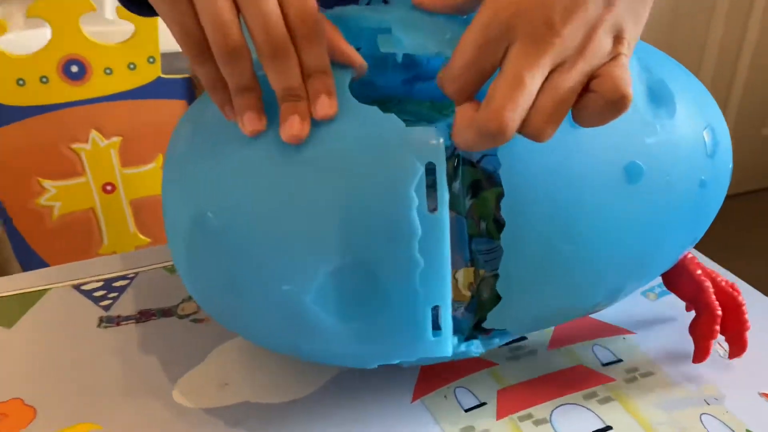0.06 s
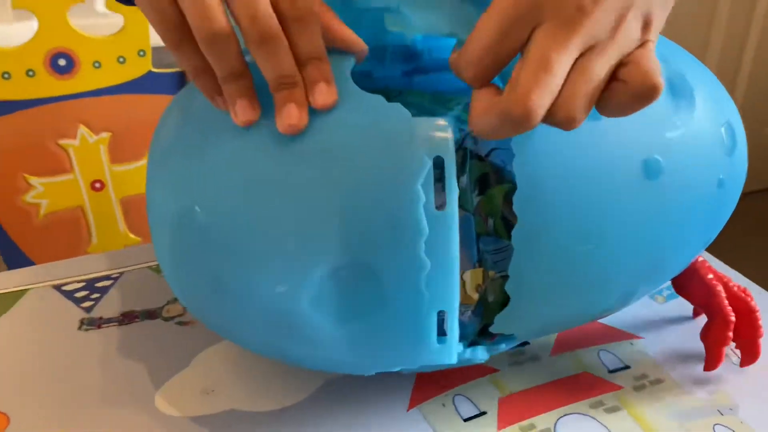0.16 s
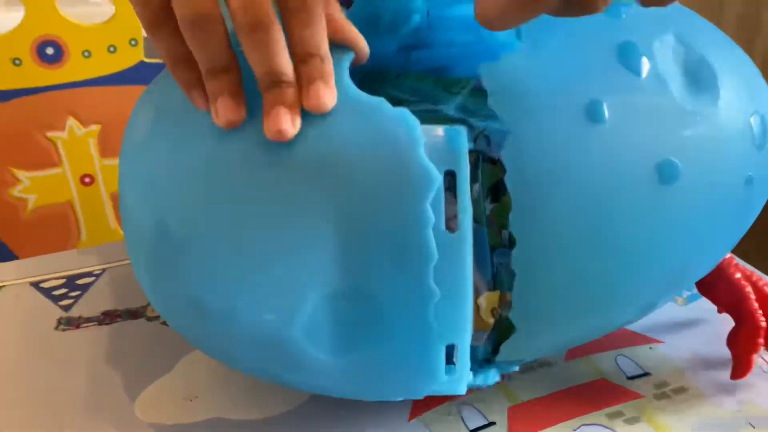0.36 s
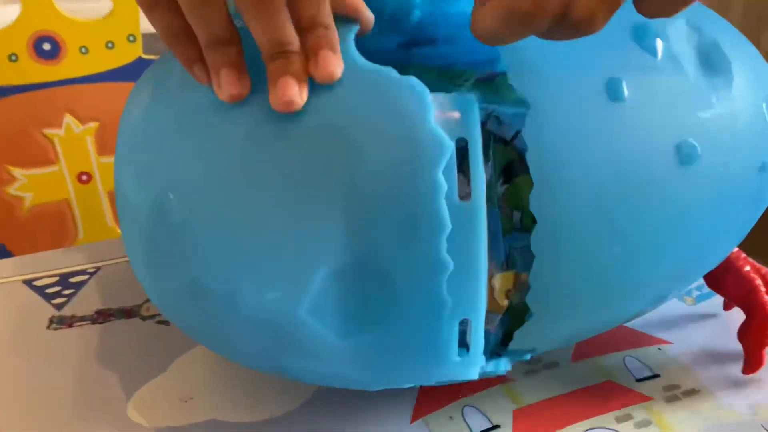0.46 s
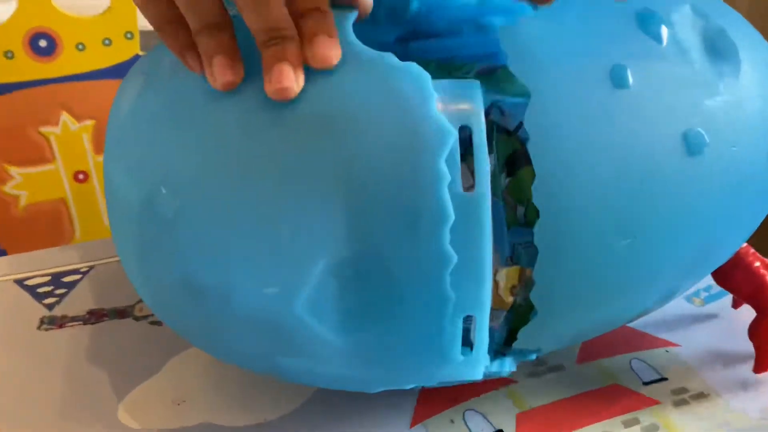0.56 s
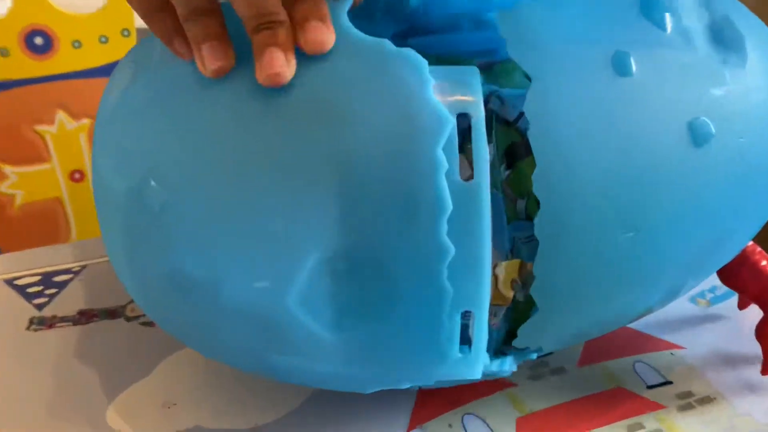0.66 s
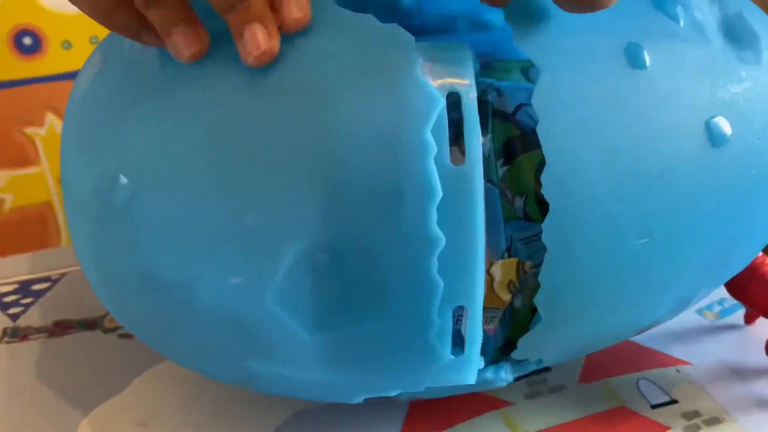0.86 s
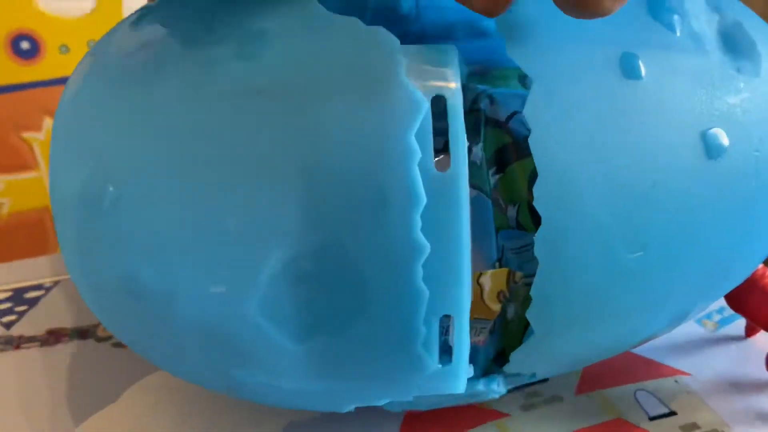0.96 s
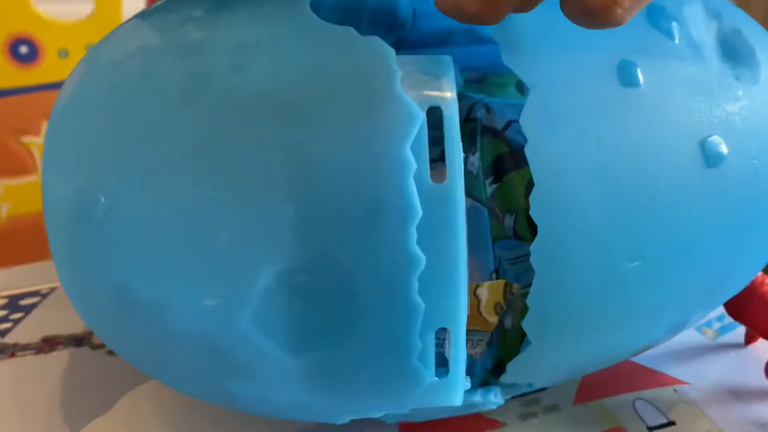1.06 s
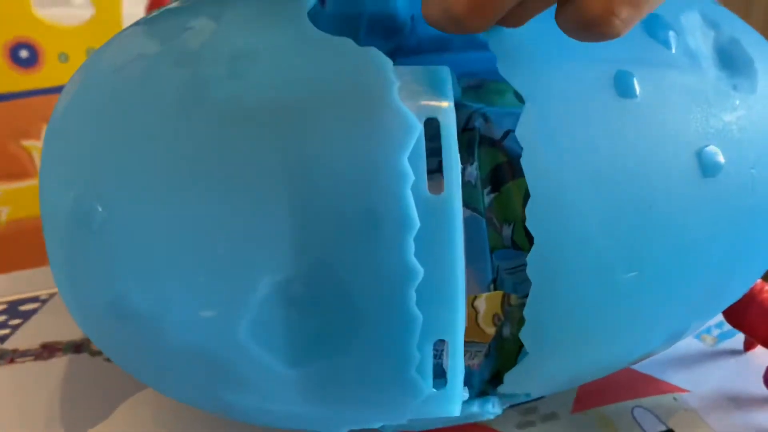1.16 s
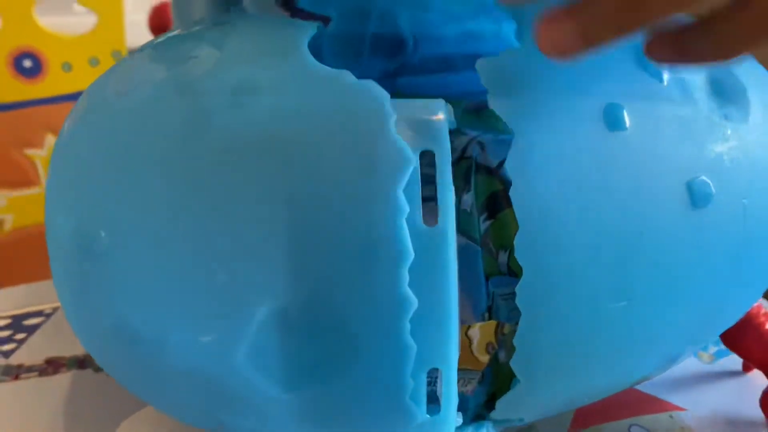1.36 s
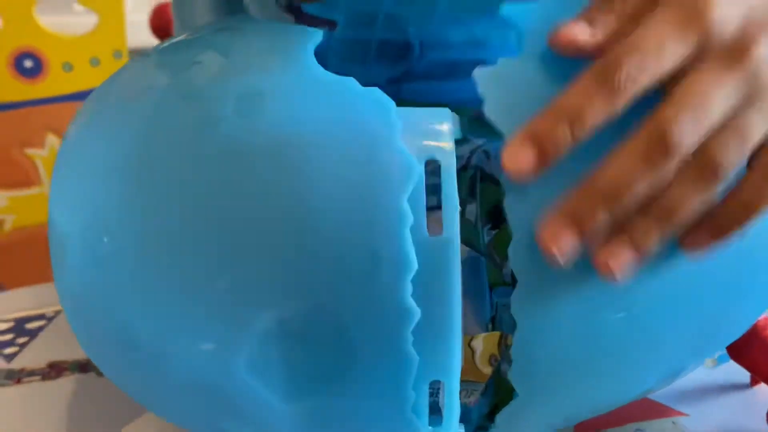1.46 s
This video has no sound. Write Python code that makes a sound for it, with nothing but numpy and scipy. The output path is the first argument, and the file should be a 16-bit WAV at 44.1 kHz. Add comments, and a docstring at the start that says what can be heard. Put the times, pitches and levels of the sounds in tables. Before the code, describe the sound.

A plastic shell snaps open with a hollow clack, followed by light bumps and scraping.

```python
"""At a table in a small room, hands prise a big hollow plastic toy egg apart, close by.
The seam lets go with a burst of cracks and the halves knock together; bending waves are dispersive,
so each blow reaches the air treble first, bass last, and the shell rings on in its modes.
Then edges and fingers rub and bump, squeak thinly once, and a last knock starts a bright scrape."""
import sys
import numpy as np
from scipy import signal
from scipy.fft import rfft, irfft
from scipy.io import wavfile
from scipy.ndimage import uniform_filter1d

SR = 44100
rng = np.random.default_rng(int(sys.argv[2]) if len(sys.argv) > 2 else 0)


def output_pcm(signal):
    """Save a mono or channel-first signal as 16-bit PCM at the path in sys.argv[1].

    Samples are clipped to [-1, 1] before scaling.
    """
    pcm = np.clip(np.atleast_2d(signal).T, -1, 1) * 32767
    wavfile.write(sys.argv[1], SR, np.round(pcm).astype(np.int16))


N = 66150


def amp(db):
    """Amplitude ratio of a level in decibels."""
    return 10 ** (np.asarray(db) / 20)


def curve_at(points, hz):
    """Interpolation of (f/Hz, value) points on a logarithmic frequency axis."""
    f, value = np.transpose(points)
    return np.interp(np.log(hz + 1), np.log(f + 1), value)


def band_gain(colour, bands_hz, levels_db, hz):
    """Filters in cascade: the levels of a common spectrum and of one event's bands add."""
    return amp(curve_at(colour, hz) + curve_at(list(zip(bands_hz, levels_db)), hz))


def add(mix, start_s, sound):
    """Superposition: a stereo sound joins the mix at its start time."""
    part = mix[:, max(round(start_s * SR), 0):][:, :sound.shape[1]]
    part += sound[:, :part.shape[1]]


def convolve(x, response):
    """Linear response: convolution with an impulse response, cut to the scene's length."""
    return signal.fftconvolve(x, response, axes=1)[:, :N]


def correlate_ears(noise):
    """Interaural coherence: long waves reach both ears alike, short waves do not."""
    # likeness of left and right (f/Hz, correlation)
    coherence = [(60, 0.86), (300, 0.75), (520, 0.62), (1200, 0.42), (2500, 0), (15000, -0.014)]
    hz = np.fft.rfftfreq(noise.shape[1], 1 / SR)
    angle = np.arcsin(np.clip(curve_at(coherence, hz), -1, 1)) / 2
    spectrum = rfft(noise)
    return irfft(np.cos(angle) * spectrum + np.sin(angle) * spectrum[::-1], noise.shape[1])


def diffuse_tail(bands, size=256):
    """Diffuse field: dense reflections merge into noise that decays exponentially in each band."""
    f, level, t60 = np.transpose(bands)
    noise = correlate_ears(rng.choice([-1., 1.], (2, SR // 2)))
    frames = dict(fs=SR, nperseg=size, noverlap=size * 3 // 4)
    hz, t, spectra = signal.stft(noise, **frames)
    decay_rate = np.log(1000) / curve_at(list(zip(f, t60)), hz)[:, None]
    gain = amp(curve_at(list(zip(f, level)), hz))[:, None] * np.sqrt(2 * decay_rate / SR)
    return signal.istft(spectra * gain * np.exp(-decay_rate * t), **frames)[1]


def room_tone():
    """Ambient noise: a quiet, steady background, strongest in the bass."""
    # spectrum of the background air (f/Hz, level/dB)
    noise_floor = [(25, -62), (55, -45.5), (120, -53), (250, -65), (380, -49.5), (600, -71), (1500, -68),
                   (4000, -80), (9000, -89), (16000, -96.5)]
    noise = correlate_ears(rng.standard_normal((2, N)))
    return irfft(rfft(noise) * amp(curve_at(noise_floor, np.fft.rfftfreq(N, 1 / SR))), N)


def room(x):
    """Reverberation: the small room's reflections build up after a short delay, then die away."""
    # reverberant field (f/Hz, level/dB, T60/s)
    reverberation = [(58.6, -19.5, 0.5), (300, -15.5, 0.34), (750, -6.5, 0.29), (1250, -2, .27),
                     (2200, -6, 0.22), (5743, -3, 0.2), (15000, -4.5, 0.17)]
    delay_s, rise_s = 0.0027, 0.006
    response = diffuse_tail(reverberation)
    t = np.arange(response.shape[1]) / SR
    return convolve(x, response * np.clip((t - delay_s) / rise_s, 0, 1))


def squeak():
    """Stick-slip oscillation: sticking plastic gives a thin, faint whistle that arches in pitch."""
    # course of the whistle (t/s, f/Hz, level/dB)
    contour = [(1.269, 9000, -86), (1.286, 9320, -63.5), (1.315, 9350, -64.5), (1.347, 9580, -69),
               (1.376, 8300, -74.5)]
    times, hz, db = np.transpose(contour)
    t = np.arange(N) / SR
    jitter = uniform_filter1d(rng.standard_normal(N), size=40)
    pitch = np.interp(t, times, hz) * (1 + 0.0136 * jitter / jitter.std())
    envelope = np.interp(t, times, amp(db), left=0, right=0)
    return envelope * np.sin(2 * np.pi * np.cumsum(pitch) / SR)


def rubs():
    """Sliding friction: plastic on plastic and skin gives swells of tiny uneven slips over a hiss."""
    # rubbing strokes (peak t/s, rise/s, decay constant/s, then level/dB at each of bands_hz)
    strokes = [ (0.028, .090, 0.032, -38, -52, -60.5, -73.5), (0.562, 0.057, 0.017, -49, -56, -59, -66.5),
               (0.750, .070, 0.023, -48.5, -54, -56, -68.5), (0.840, 0.053, .040, -44, -54, -49.5, -52.5),
               (0.898, 0.049, 0.0094, -35, -49, -37, -47), (0.976, 0.051, 0.026, -35, -44, -52, -59.5),
               (1.033, 0.04, .060, -43, -51.5, -53, -66.5), (1.157, 0.092, 0.032, -38, -47.5, -46.5, -58.5),
               (1.230, 0.033, 0.014, -41, -44, -55.5, -60), (1.338, 0.21, 0.29, -47.5, -64, -56, -67),
               (1.416, 0.021, 0.04, -37.5, -41.5, -30.5, -35), ]
    # spectrum common to all rubs (f/Hz, level/dB)
    colour = [(25, -6.5), (60, -4.5), (150, 1.5), (250, -3), (380, 7.5), (560, 1.5), (900, -4), (1150, 3.5),
              (1400, 3), (1600, -2.5), (1800, 4.5), (1900, 1), (2030, 1), (2210, 5), (2400, 0), (3300, 1),
              (4300, -0.5), (4900, 0.5), (5800, 1), (6650, -1), (8000, -2.5), (10500, -3.5), (15000, -12.5)]
    bands_hz = [300, 900, 2400, 7000]
    slips_per_s, slip_spread_db, hiss = 2500, 3, 1.3
    out, t, hz = np.zeros((2, N)), np.arange(N) / SR, np.fft.rfftfreq(N, 1 / SR)
    for peak, rise, fall, *levels in strokes:
        slipping = rng.random(N) < slips_per_s / SR
        slips = slipping * amp(slip_spread_db * np.minimum(rng.exponential(1, N), 4))
        friction = correlate_ears(rng.standard_normal((2, N)) * (slips / slips.std() + hiss))
        swell = np.clip(1 + (t - peak) / rise, 0, 1) * np.exp(-np.maximum((t - peak) / fall, 0))
        spectrum = rfft(friction / friction.std()) * band_gain(colour, bands_hz, levels, hz)
        out += swell * irfft(spectrum, N)
    return out


def shell_ring(x):
    """Modal resonance: whatever shakes the hollow egg sets off its damped natural vibrations."""
    # modes of the shell (f/Hz, relative level/dB, T60/s)
    modes = [(97.5, -2, .35), (192.1, -14.5, 0.35), (243, -7.5, 0.29), (323.6, -1.5, .25),
             (419.3, -3.5, 0.2), (494.5, -15, 0.35), (746, -11, 0.21), (900, -3.5, 0.29),
             (1248, -1.5, 0.091), (1260, -2.5, 0.09), (1766, -12, 0.39), (1890, -0.5, 0.082),
             (2253, 1.5, 0.25), (6530, 6, 0.088), (7000, -0.5, 0.092)]
    coupling_db = -52.5
    t = np.arange(SR // 2) / SR
    ring = sum(amp(db) * np.exp(-np.log(1000) * t / t60) * np.cos(2 * np.pi * hz * t)
               for hz, db, t60 in modes)
    return amp(coupling_db) * convolve(x, ring[None])


def shell_scatter(x):
    """Multiple reflection inside the shell gives each blow a very short diffuse tail."""
    # diffuse field in the shell (f/Hz, level/dB, T60/s)
    reflections = [(196.8, -22.5, .04), (688, -7.5, .04), (1970, 3.5, 0.022), (7000, 3, 0.026),
                   (15000, 3.5, .012)]
    return convolve(x, diffuse_tail(reflections, size=64))


def blows(size=8192):
    """Dispersion: low bending waves travel slower, so each blow spreads into a quick falling chirp."""
    # cracks and knocks (t/s, level/dB at each of bands_hz, left minus right level/dB)
    impacts = [ (0.0212, -8.5, -9, -36.5, -25, -47, 0), (0.0655, 0.5, -3, -14.5, -39.5, -51.5, 2.5),
               (0.0921, -3, -13.5, -27, -55, -57, -7.5), (0.2058, 23, 26.5, 5.5, -1.5, -6.5, 1),
               (0.2087, 18.5, 15, 17.5, 3, 0, -6.5), (0.2101, 0, 9, 0, 4.5, -0.5, 10),
               (0.2160, 16.5, 20, 13, -1.5, -0.5, 1.5), (0.2198, 17, 25.5, 11, 9.5, -24, -4.5),
               (0.2253, 4, 19.5, 9.5, 3.5, -8, -9.5), (0.2327, 8, 15.5, 11.5, 7, -5, 0),
               (0.2363, 31.5, 25.5, 24, 12, -11.5, 2.5), (0.3798, -23.5, -13.5, -6, -17, -30.5, -1),
               (0.5220, -32, -23.5, -38, -46, -45.5, 1.5), (0.804, -32, -26.5, -35, -31, -35, 10),
               (0.8544, -6, 0, -16, -41.5, -33, 2.5), (0.8700, 2.5, -16.5, -25, -28, -44, 8.5),
               (0.8902, -21.5, -12, -32.5, -20.5, -25, -9), (0.8969, -14, -12, -16.5, -13.5, -28, 5.5),
               (0.9470, -27, -15, -26, -28, -51, -3), (0.9700, -9, -10, -30, -23, -45, -2),
               (0.9887, -7, -9, -41, -46.5, -48, 1.5), (1.1400, -6.5, -23, -40, -30, -46, -15),
               (1.2050, -13, -11, -26.5, -31, -46, -1), (1.2915, -15, -6.5, -20, -35.5, -50.5, 0),
               (1.3440, -12, -20, -38, -69.5, -55, -9), (1.4015, -2, 6, -15, -28, -27, -4.5),
               (1.407, 0.5, 4.5, -22.5, -30.5, -21.5, 7), (1.4170, 18, -3, -20, -23, -22, 4), ]
    # spectrum common to all blows (f/Hz, level/dB)
    colour = [(25, -31.5), (45, -23), (65, -6.5), (120, -2), (200, 1), (330, 3), (430, 6), (560, -3),
              (760, 0), (900, 1), (1030, 0), (1270, -0.5), (1600, -8), (1950, -0.5), (2300, -2),
              (2800, -2.5), (3400, -6), (4300, -9.5), (5000, -8.5), (5900, -7.5), (7100, -2.5), (9000, -16),
              (15000, -19)]
    bands_hz = [90, 300, 900, 2400, 7000]
    bass_lag_s, knee_hz, lag_slope = 0.011, 295.4, 2.2
    right_ear_lag_s = 0.00012
    out, hz = np.zeros((2, N)), np.fft.rfftfreq(size, 1 / SR)
    group_delay = bass_lag_s / (1 + (hz / knee_hz) ** lag_slope)
    dispersion = np.exp(-2j * np.pi * np.cumsum(group_delay) * SR / size)
    ear_delay = np.exp(-2j * np.pi * hz * np.array([[0], [right_ear_lag_s]]))
    for start_s, *levels, pan_db in impacts:
        log_gain = np.log(band_gain(colour, bands_hz, levels, hz))
        mirrored = np.r_[log_gain, log_gain[-2:0:-1]]
        # minimum phase: nothing sounds ahead of the impact
        pulse_spectrum = np.exp(np.conj(signal.hilbert(mirrored)))[:len(hz)]
        chirp = irfft(pulse_spectrum * dispersion * ear_delay)[:, :size // 2]
        add(out, start_s, chirp * amp([[pan_db / 2], [-pan_db / 2]]))
    return out


def scene():
    """Source and resonator: blows and friction excite both the shell and the room."""
    hits = blows()
    direct = hits + shell_scatter(hits) + rubs() + squeak()
    return direct + shell_ring(direct) + room(direct) + room_tone()


def record(dry):
    """Band limiting: a steep low-pass filter removes the highest treble."""
    cutoff_hz = 16200
    lowpass = signal.firwin(511, cutoff_hz, window=("kaiser", 9), fs=SR)
    return signal.oaconvolve(dry, lowpass[None], "same")


dry = scene()
out = record(dry)
output_pcm(out)
```